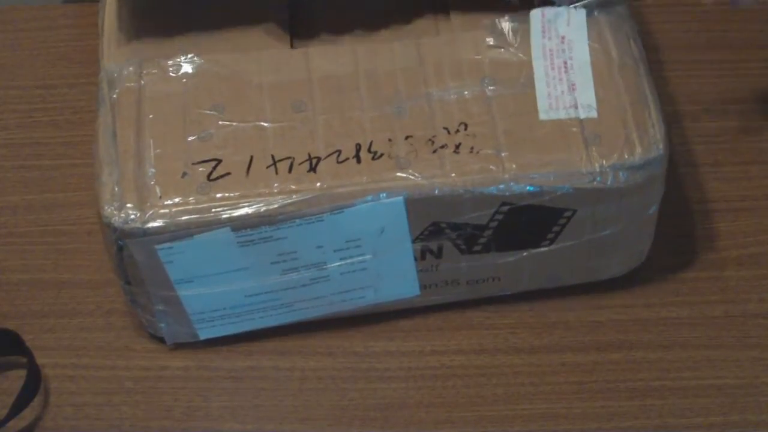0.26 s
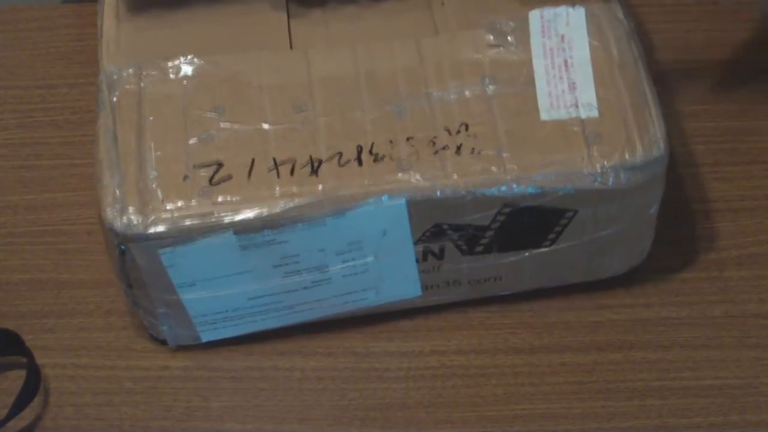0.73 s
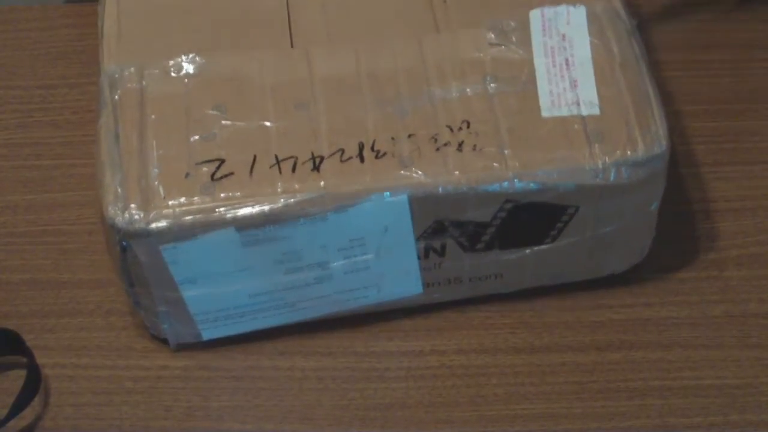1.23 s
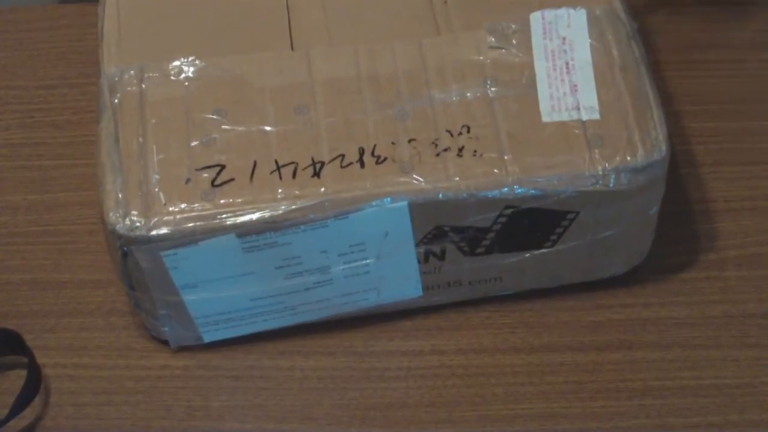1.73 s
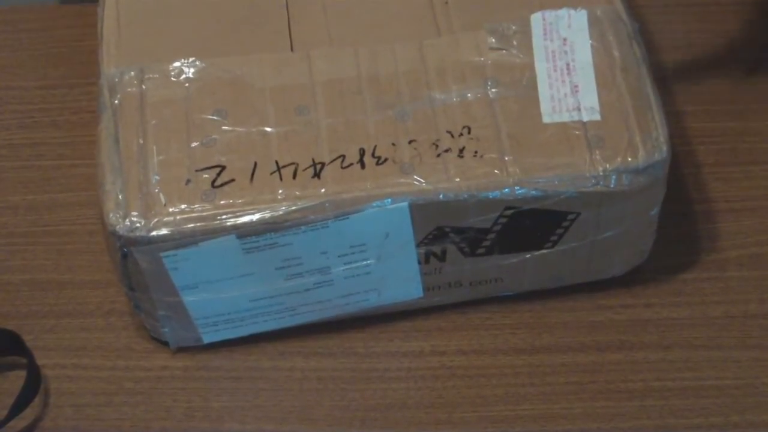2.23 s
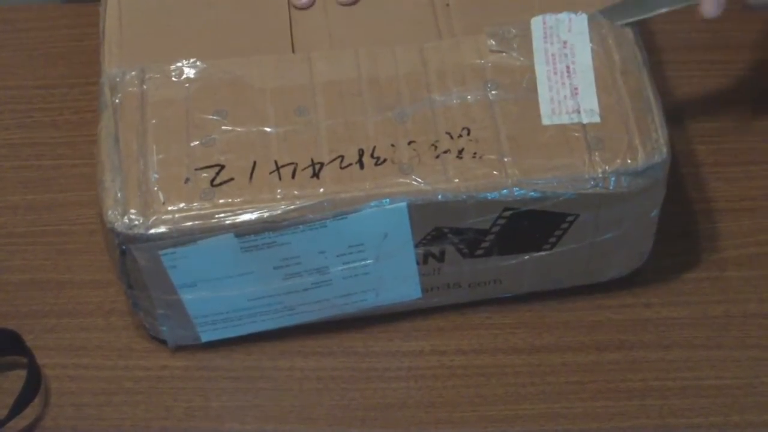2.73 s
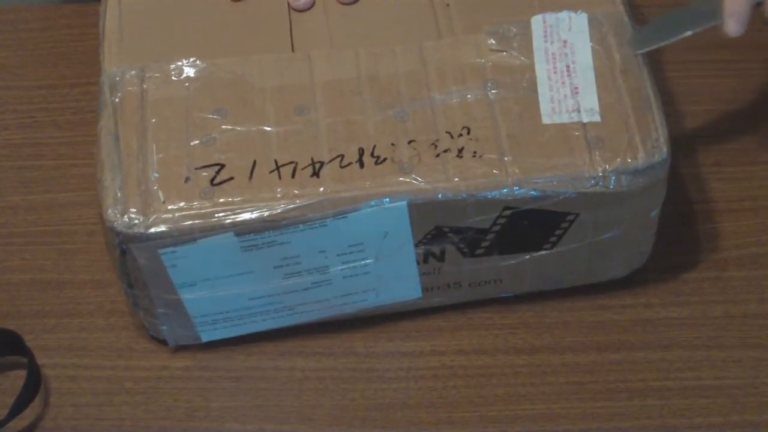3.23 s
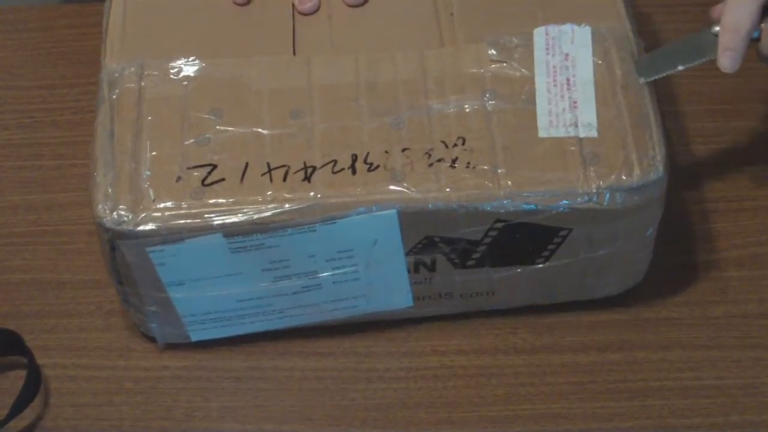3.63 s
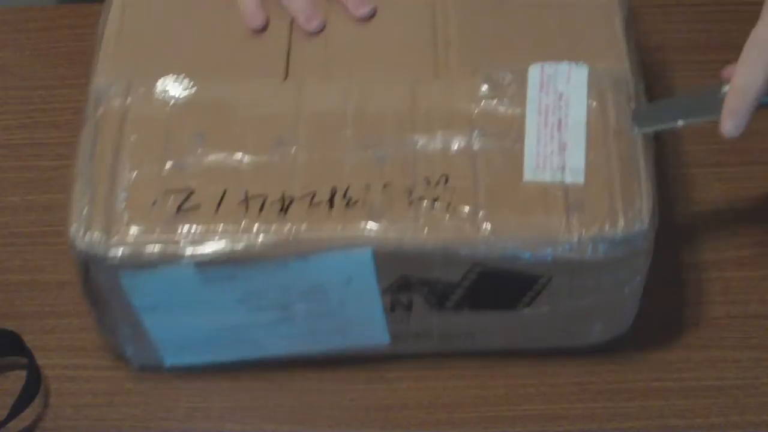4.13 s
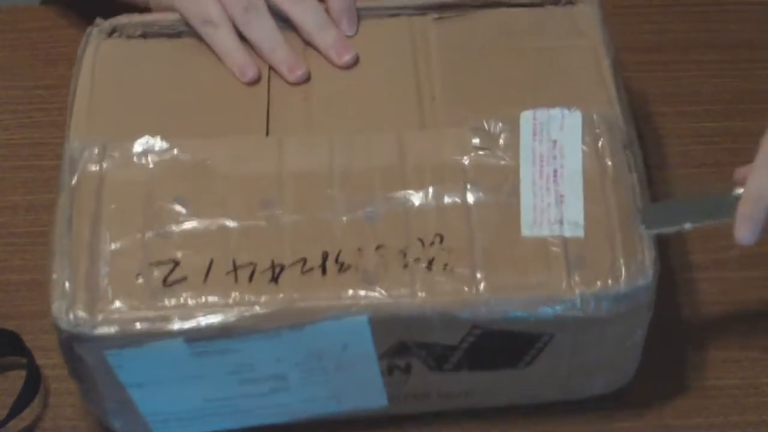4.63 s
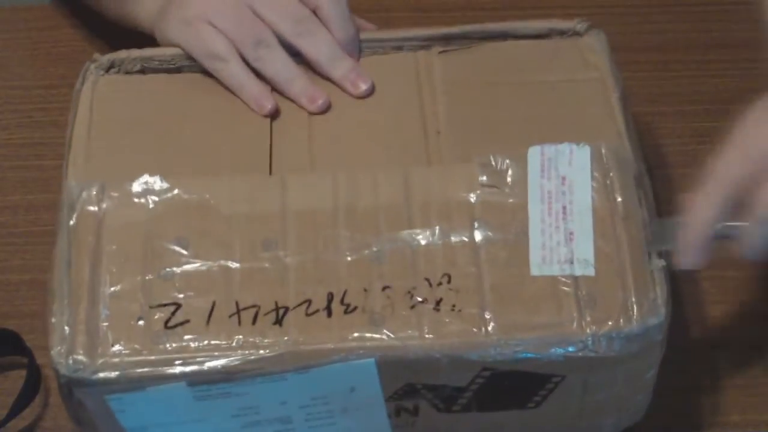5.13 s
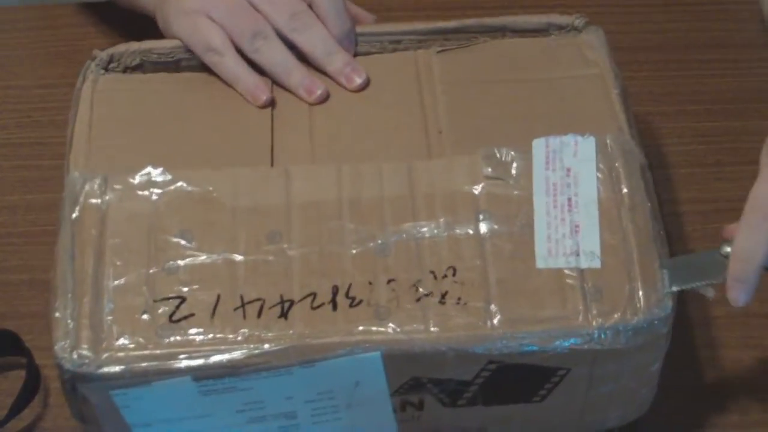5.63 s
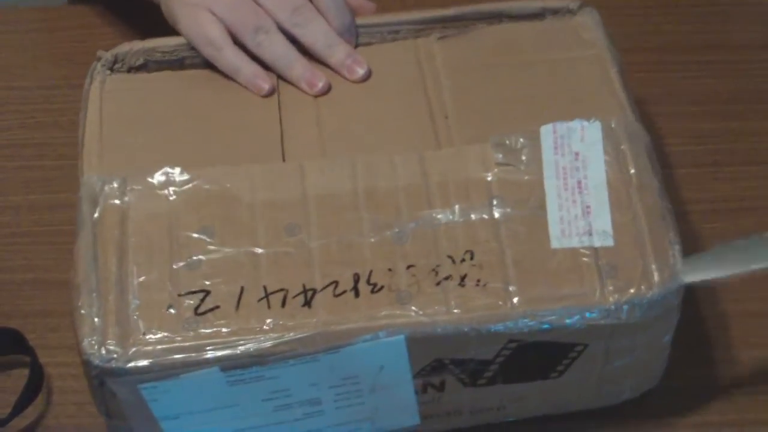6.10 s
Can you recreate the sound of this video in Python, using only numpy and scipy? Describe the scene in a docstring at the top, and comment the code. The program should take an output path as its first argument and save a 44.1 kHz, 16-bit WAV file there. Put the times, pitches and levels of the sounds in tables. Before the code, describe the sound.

In a small room, close to the microphone, tape on a cardboard box rips in a quick burst of sharp snaps, crackle and hollow knocks with low puffs. A quieter gap has soft hand rubs and a short fingertip squeak. More snapping follows, then scattered ticks and bumps, and finally a knife judders through the side wall. Faint hum and dull hiss stay beneath.

```python
"""Sharp snaps and crackle, hollow knocks and soft puffs: a knife slits the tape of a cardboard box in a small room.
Snaps are short pulse and noise bursts; they knock the modes of the flap, and jerks of the flap puff air out.
Random grains make the tearing tape, the hand sliding over the board and the palm brushing the lid.
Late on, the blade judders along the side wall by stick and slip; mains hum and hiss lie below throughout."""
import sys
import numpy as np
from scipy import signal
from scipy.fft import rfft, irfft
from scipy.io import wavfile

SR = 44100
rng = np.random.default_rng(int(sys.argv[2]) if len(sys.argv) > 2 else 0)


def int16_out(signal):
    """Quantize to a 16-bit WAV file."""
    q = np.round(np.clip(np.atleast_2d(signal).T, -1, 1) * 32767)
    wavfile.write(sys.argv[1], SR, q.astype(np.int16))


N = 280514  # samples


def from_db(db):
    """Decibel law: 20 dB is a factor of ten in amplitude."""
    return 10 ** (np.asarray(db) / 20)


def rms_one(x):
    """Normalisation to unit root mean square."""
    return x / np.sqrt(np.mean(x ** 2) + 1e-20)


def at_hz(points, hz):
    """Interpolation of a spectrum along a logarithmic frequency axis."""
    point_hz, values = np.array(points).T[:2]
    return np.interp(np.log(np.maximum(hz, 1)), np.log(point_hz), values)


def butter(x, hz, kind):
    """Second-order Butterworth filter, flat in its passband."""
    return signal.sosfilt(signal.butter(2, hz, kind, fs=SR, output="sos"), x)


def colour(x, spectrum):
    """Minimum-phase filter: folding the cepstrum makes the given spectrum causal."""
    size = 8192
    log_gain = np.log(from_db(at_hz(spectrum, np.fft.rfftfreq(size, 1 / SR))))
    cepstrum = irfft(log_gain)
    cepstrum[1:size // 2] *= 2
    cepstrum[size // 2 + 1:] = 0
    impulse_response = irfft(np.exp(rfft(cepstrum)))
    return signal.fftconvolve(x, impulse_response)[:len(x)]


def drift(rate):
    """Slow random fluctuation of unit rms: lines between chance values, rate of them a second."""
    knots = np.arange(N) / SR * rate
    return rms_one(np.interp(knots, np.arange(4096), rng.standard_normal(4096)))


def clicks(times, sizes):
    """Impulsive forcing: one sample of the given size at each time."""
    out = np.zeros(N)
    at = np.round(np.asarray(times) * SR).astype(int)
    out[np.clip(at, 0, N - 1)] = sizes
    return out


def ring(force, hz, t60):
    """Damped resonator: a unit click starts an oscillation of height 1 that falls 60 dB in t60 seconds."""
    r = from_db(-60 / (t60 * SR))
    w = 2 * np.pi * hz / SR
    return signal.lfilter([1, -r * np.cos(w)], [1, -2 * r * np.cos(w), r * r], force + 1e-18)


def body(force, modes):
    """Modal superposition: one force drives all modes in parallel, with alternating signs."""
    return sum((-1) ** k * from_db(db) * ring(force, hz, t60) for k, (hz, db, t60) in enumerate(modes))


def grains(per_s, spread_db):
    """Poisson process of tiny breaks: random moments and signs, most of them faint."""
    sizes = from_db(spread_db * np.minimum(rng.exponential(1, N), 3.5))
    signs = rng.choice([-1, 1], N)
    return sizes * signs * (rng.random(N) < per_s / SR)


def envelopes(rows, attack_s, release_s):
    """Exponential growth and decay around each gesture, added in power; one gain for each level column."""
    t, power = np.arange(N) / SR, 0
    for s, length_s, *levels_db in rows:
        before = np.maximum(s - t, 0)
        after = np.maximum(t - s - length_s, 0)
        shape = np.exp(-before / attack_s - after / release_s)
        power = power + (from_db(levels_db)[:, None] * (shape + 1e-9)) ** 2
    return np.sqrt(power)


# Spectrum of the hiss and rumble. Each row: frequency in Hz, density in relative dB per Hz.
HISS_SPECTRUM = [(10, -11), (28, -1.5), (45, -11), (90, -13), (140, -14), (200, -17), (300, -16),
                 (450, -21), (800, -23.5), (1500, -26.5), (3000, -28), (6800, -28.5), (9000, -84)]
# Course of the background hiss. Each row: time in seconds, level in dB rms.
HISS_LEVEL = [(0, -51), (1.3, -47.5), (2.4, -49), (3.7, -50.5), (4.2, -47), (4.9, -46.5), (5.7, -49),
              (6.36, -44.5)]
# Components of the mains hum. Each row: frequency in Hz, mean level in dB rms.
HUM = [(59.5, -58), (119.5, -57), (242, -60)]


def background(waver_db=0.2):
    """Stationary noise and tones: filtered hiss at a slowly moving level, hum wavering in level and phase."""
    t = np.arange(N) / SR
    hiss_gain = from_db(np.interp(t, *np.transpose(HISS_LEVEL)))
    hiss = hiss_gain * rms_one(colour(rng.standard_normal(N), HISS_SPECTRUM))
    hum = 0
    for hz, db in HUM:
        height = np.sqrt(2) * from_db(db + waver_db * drift(5.8))
        hum = hum + height * np.sin(2 * np.pi * hz * t + 0.13 * drift(2.3))  # phase wander in radians
    return hiss + hum


# Rips of the tape. Each row: start in seconds, length in seconds, crackle level in dB,
# box rustle level in relative dB.
RIPS = [(0.008, 0.018, -31, -32), (0.04, 0.052, -37, -32), (0.11, .025, -40, -34),
        (0.168, .035, -48.5, -34.5), (0.462, .008, -51, -55), (0.478, .004, -29.5, -38),
        (0.503, 0.019, -45.5, -36), (0.56, 0.078, -47, -50.5), (0.765, 0.015, -34, -31),
        (0.815, 0.028, -34.5, -42), (0.868, 0.01, -33, -36), (0.912, 0.041, -35, -34),
        (2.515, 0.03, -52, -36.5), (2.56, 0.13, -49, -53), (2.82, 0.074, -42, -38),
        (3.01, 0.037, -42.5, -51), (3.072, 0.018, -37, -29), (3.118, 0.045, -37.5, -34),
        (3.19, 0.079, -48, -58), (3.345, 0.046, -46, -49.5), (4.555, 0.016, -41.5, -39.5),
        (4.6, 0.024, -39.5, -33), (5.12, 0.037, -40, -37), (5.195, 0.023, -44, -40),
        (5.32, 0.021, -42, -34), (5.465, 0.029, -44, -52)]
RIP_ATTACK_S, RIP_RELEASE_S = 0.0074, 0.016
# Colour of the crackle. Each row: frequency in Hz, gain in relative dB.
CRACKLE_SPECTRUM = [(300, -10), (900, -5.5), (1600, -7), (2600, -8.5), (4000, -10.5), (5500, -5.5),
                    (7000, -11), (9000, -14.5)]
# Modes of the top flap. Each row: frequency in Hz, strength in relative dB, 60 dB decay time in seconds.
FLAP_MODES = [(112, -15, 0.078), (143.2, -9.5, 0.12), (212.2, -5, 0.11), (253.5, -2.5, 0.073),
              (302.3, -2, 0.063), (349, -3.5, 0.064), (408, -4.5, 0.055), (510, -1.5, 0.049),
              (616, -8, 0.045), (703, -5, 0.037), (980, 2.5, 0.012), (1016, 2.5, 0.015), (1193, -7, 0.029),
              (1368, -7.5, 0.033), (1456, -12.5, 0.022)]


def tearing(crackle_db=0, rustle_db=-1, sway_db=-10, clump_db=2.5):
    """Random fracture: clumps of tiny breaks crackle and shake the flap's modes; its sway fans the air."""
    crackle, rustle = envelopes(RIPS, RIP_ATTACK_S, RIP_RELEASE_S)
    fibres = grains(per_s=1300, spread_db=6.0) * from_db(clump_db * drift(200))
    top = from_db(crackle_db) * crackle * rms_one(colour(fibres, CRACKLE_SPECTRUM))
    shaking = fibres + grains(per_s=6000, spread_db=3.5)
    box = from_db(rustle_db) * rms_one(body(shaking, FLAP_MODES))
    air = from_db(sway_db) * rms_one(butter(rng.standard_normal(N), [12, 60], "band"))
    return top + rustle * (box + air)


# Jerks with which the flap gives way. Each row: time in seconds, level in relative dB.
JERKS = [(0.037, -49.5), (0.368, -31), (0.473, -30), (0.638, -32), (0.762, -27), (0.813, -29), (0.911, -28),
         (2.509, -41.5), (2.862, -28.5), (3.06, -25.5), (3.125, -22), (4.599, -35.5), (5.322, -29),
         (6.209, -32)]
# Bumps of the box on the table. Each row: time in seconds, level in relative dB.
BUMPS = [(0.04, -29), (0.161, -24.5), (0.48, -16), (0.766, -21.5), (2.51, -34), (5.3929, -23),
         (6.203, -31.5)]


def puffs(puff_db=1, bump_db=0):
    """Damped resonance: jerks push air out in a very low swing, and bumps on the table thud."""
    s, level_db = np.transpose(JERKS)
    air = ring(clicks(s, from_db(level_db + puff_db)), hz=9, t60=0.12)
    s, level_db = np.transpose(BUMPS)
    thuds = ring(clicks(s, from_db(level_db + bump_db)), hz=131.7, t60=0.082)
    return butter(air, 160, "low") + butter(thuds, 500, "low")


# Snaps of tape and board. Each row: time in seconds, crack level in relative dB, crack pitch in Hz,
# box knock level in relative dB.
SNAPS = [(0.0391, -10.5, 2020, -15.5), (0.0614, -17, 4400, -52), (0.0718, -8, 3050, -37),
         (0.1597, -16, 1580, -17.5), (0.164, -17, 1000, -34), (0.191, -20, 1500, -31),
         (0.2962, -26.5, 3800, -51), (0.3442, -26, 4970, -38.5), (0.3686, -16, 4200, -46),
         (0.3748, -10, 4160, -27.5), (0.4748, -4, 2600, -28.5), (0.4772, -4.5, 1090, -35),
         (0.497, -3.5, 2640, -17.5), (0.6392, -24, 2540, -39.5), (0.7599, -7.5, 3100, -43),
         (0.765, -5, 1280, -10), (0.7712, -16, 1090, -29), (0.8133, -8.5, 2640, -41),
         (0.867, -12, 1900, -33), (0.9085, -13.5, 1470, -27), (0.9204, -17, 4360, -31.5),
         (1.1488, -13, 3020, -22), (1.649, -28.5, 4600, -48), (2.5095, -14.5, 3700, -24),
         (2.6979, -23, 4300, -42), (2.7923, -22.5, 5630, -52), (2.8184, -18, 3400, -25.5),
         (2.8481, -14, 3600, -53), (2.869, -15.5, 4200, -29), (2.914, -20.5, 3700, -40),
         (3.038, -23, 2980, -37), (3.0574, -16.5, 3500, -28), (3.0689, -9, 2120, -29),
         (3.139, -16, 2600, -21), (3.1527, -12.5, 2720, -39), (3.3145, -26, 5500, -59),
         (3.3283, -22, 4500, -55), (3.349, -23.5, 1100, -22.5), (3.431, -28.5, 2020, -36.5),
         (3.886, -22.5, 3160, -26), (3.9198, -20, 3360, -26.5), (4.3284, -23, 1720, -28),
         (4.3893, -18, 1640, -20.5), (4.4523, -17, 3340, -20), (4.5501, -23.5, 1200, -23.5),
         (4.6027, -17.5, 3200, -25.5), (5.1172, -25.5, 2300, -18.5), (5.3218, -24, 2800, -46),
         (5.349, -22, 4030, -49), (5.493, -15.5, 3740, -25.5), (5.979, -28, 5500, -46),
         (6.036, -22.5, 3500, -37), (6.2031, -18.5, 3000, -41.5), (6.215, -15.5, 3770, -53)]
# Colour shared by all cracks. Each row: frequency in Hz, gain in relative dB.
CRACK_SPECTRUM = [(300, -12.5), (800, 11.5), (1500, 3), (2600, 3), (4000, 2), (5500, 3.5), (7000, -1),
                  (12000, 3.5)]
CUTOFF_HZ = 7150  # upper limit of the microphone


def cracks(bursts, level_db, width=2.22):
    """Band-limited impulse radiation: each snap's burst is filtered around its pitch and set by its energy."""
    out = np.zeros(N + SR)
    for (s, crack_db, hz, _), burst in zip(SNAPS, bursts):
        band = [hz / width, min(hz * width, .4 * SR)]
        burst = signal.lfilter(*signal.butter(1, band, "band", fs=SR), burst)
        burst = butter(burst, hz / 5, "high")
        passed = np.linalg.norm(butter(burst, CUTOFF_HZ, "low"))  # root energy below the cutoff
        at = int(s * SR)
        out[at:at + len(burst)] += from_db(crack_db + level_db) * burst / passed
    return colour(out[:N], CRACK_SPECTRUM)


def pulse_clusters(gap_s=.0007, loss_db=5.5, count=3):
    """Pulse cluster: each snap is a few sharp clicks about a millisecond apart, each weaker than the last."""
    gaps = gap_s * rng.uniform(.5, 1.5, (len(SNAPS), count))
    pulses = np.zeros((len(SNAPS), SR // 40))
    for pulse, gap in zip(pulses, gaps):
        at = ((np.cumsum(gap) - gap[0]) * SR).astype(int) % len(pulse)
        pulse[at] = rng.choice([-1, 1], count) * from_db(-loss_db * np.arange(count))
    return cracks(pulses, level_db=5.5)


def splinters(splinter_s=.0016):
    """Decaying noise burst: the broken edge splinters for a few milliseconds."""
    t = np.arange(SR // 40) / SR
    noise = rng.standard_normal((len(SNAPS), len(t)))
    return cracks(noise * np.exp(-t / splinter_s) * (t > .0003), level_db=-2.0)


def knocks(knock_db=-9, scatter_db=2.0):
    """Modal excitation by impact: each snap strikes every flap mode with a strength of its own."""
    s, _, _, level_db = np.transpose(SNAPS)
    scatter = scatter_db * rng.standard_normal((len(s), len(FLAP_MODES)))
    sizes = from_db(level_db[:, None] + knock_db + scatter)
    rings = 0
    for k, (hz, db, t60) in enumerate(FLAP_MODES):
        rings = rings + (-1) ** k * from_db(db) * ring(clicks(s, sizes[:, k]), hz, t60)
    return butter(rings, 2500, "low")


# Strokes of hand and blade on the board. Each row: start in seconds, length in seconds,
# friction hiss level in dB, wall drone level in relative dB.
STROKES = [(1.44, 0.057, -57, -54), (1.555, 0.045, -43.5, -46.5), (1.925, 0.024, -52, -49),
           (2.462, 0.015, -41, -46), (5.28, 0.038, -42, -40), (5.352, 0.0057, -36.5, -51),
           (5.395, .008, -42, -42.5), (5.435, .006, -41.5, -58), (5.978, .035, -37, -34.5),
           (6.048, 0.019, -44.5, -32), (6.09, 0.014, -53, -33), (6.145, 0.077, -43.5, -37),
           (6.216, 0.013, -40, -27), (6.25, 0.018, -66, -48)]
STROKE_ATTACK_S, STROKE_RELEASE_S = 0.017, 0.0064
# Colour of the friction. Each row: frequency in Hz, gain in relative dB.
FRICTION_SPECTRUM = [(300, -5.5), (800, -15), (1400, -4.5), (2300, -9.5), (3500, -6), (5500, -2),
                     (7000, -5.5), (9000, -20.5)]
# Sticking and slipping of the blade in the side wall. Each row: time in seconds, level in relative dB.
SLIPS = [(5.980, -24.5), (6.036, -14.5), (6.062, -28), (6.092, -25), (6.19, -22), (6.2032, -13.5),
         (6.215, -24)]
# Modes of the side wall. Each row: frequency in Hz, strength in relative dB, 60 dB decay time in seconds.
WALL_MODES = [(146, -13, 0.098), (236, -6.5, 0.036), (274, -10.5, 0.08), (320, -14, 0.094),
              (394, -3, 0.033), (506.5, -3.5, 0.076), (570, -10.5, 0.037), (613, -13, 0.1),
              (795, -10, 0.022), (980, -9, 0.02), (1480, -14, 0.011)]


def sliding(hiss_db=0, drone_db=-1, slip_db=-2, contact_hz=2500, catch_db=4.5):
    """Stick-slip friction: fine contacts hiss on the board, and slips set the side wall's modes droning."""
    hiss, drone = envelopes(STROKES, STROKE_ATTACK_S, STROKE_RELEASE_S)
    contacts = colour(grains(per_s=7600, spread_db=2.5), FRICTION_SPECTRUM)
    rub = rms_one(contacts * from_db(catch_db * drift(220)))
    judder = rms_one(body(grains(per_s=900, spread_db=3.0), WALL_MODES))
    s, level_db = np.transpose(SLIPS)
    slips = body(clicks(s, from_db(level_db + slip_db)), WALL_MODES)
    slips = butter(slips, contact_hz, "low")
    return from_db(hiss_db) * hiss * rub + from_db(drone_db) * drone * judder + slips


# Brushes of a palm over the lid. Each row: start in seconds, length in seconds, level in dB.
BRUSHES = [(1.56, 0.038, -54.5), (1.76, .06, -56), (1.935, 0.022, -48), (2.125, 0.021, -46),
           (2.18, 0.076, -49)]
BRUSH_ATTACK_S, BRUSH_RELEASE_S = 0.027, 0.028
# Colour of skin on cardboard. Each row: frequency in Hz, gain in relative dB.
PALM_SPECTRUM = [(200, -23.5), (500, 5.5), (800, 0.5), (1450, 0.5), (1900, -9.5), (3000, -12.5),
                 (7000, -13), (9000, -44)]


def brushing():
    """Soft-contact friction: skin on cardboard gives a dull, finely grained rub."""
    pressure, = envelopes(BRUSHES, BRUSH_ATTACK_S, BRUSH_RELEASE_S)
    return pressure * rms_one(colour(grains(per_s=2900, spread_db=5.0), PALM_SPECTRUM))


# Squeaks of fingertips on the side wall. Each row: centre in seconds, Gaussian width in seconds,
# mean slip rate per second, level in dB.
SQUEAKS = [(1.574, .022, 485, -37), (1.948, .02, 500, -50), (2.472, .012, 490, -47)]


def squeaking(jitter=0.0391):
    """Near-periodic stick-slip: a dragged fingertip slips almost evenly, near a resonance of the wall."""
    t, out = np.arange(N) / SR, 0
    for s, width_s, hz, db in SQUEAKS:
        cycles = np.cumsum(hz * (1 + jitter * drift(150))) / SR
        pulses = np.diff(np.floor(cycles), prepend=0)  # one slip per completed cycle
        squeak = rms_one(butter(body(pulses, WALL_MODES), [250, 1600], "band"))
        out = out + from_db(db) * np.exp(-((t - s) / width_s) ** 2) * squeak
    return out


# Decay of the room. Each row: frequency in Hz, 60 dB decay time in seconds.
ROOM_T60 = [(100, 0.43), (260, 0.24), (700, 0.28), (1840, 0.3), (4850, 0.27), (7500, 0.16)]


def echo(early_db=-5, early_s=0.0075, tail_db=-3):
    """Reverberation: table and box scatter sound at once; the walls' tail dies band by band."""
    t = np.arange(SR // 2) / SR
    edges = np.geomspace(90, 11520, 8)  # band edges in Hz
    tail = 0
    for lo, hi in zip(edges, edges[1:]):
        decay = from_db(-60 * t / at_hz(ROOM_T60, np.sqrt(lo * hi)))
        tail = tail + butter(rng.standard_normal(len(t)), [lo, hi], "band") * decay
    tail = tail * np.clip((t - .003) / 0.0038, 0, 1)  # fades in after the early scatter has begun
    early = butter(rng.standard_normal(len(t)), [150, 11000], "band")
    early = early * np.exp(-t / early_s) * (t > .001)
    mix = from_db(tail_db) * rms_one(tail) + from_db(early_db) * rms_one(early)
    return mix / np.sqrt(2 * len(t))


def room(x, count=5):
    """Blended reverberation: several random echoes of one small room, in drifting shares, give an even tail."""
    shares = np.array([drift(25) for _ in range(count)]) ** 2
    shares = shares / np.linalg.norm(shares, axis=0)
    return sum(signal.fftconvolve(x * share, echo())[:N] for share in shares)


def scene():
    """Linear superposition: the box and its echo in the room, the dry splintering and the background."""
    box = tearing() + puffs() + pulse_clusters() + knocks() + sliding() + brushing() + squeaking()
    return (box + room(box) + splinters() + background())[None]


def record(dry):
    """Saturation and band-limiting: a narrow-band microphone rounds high peaks and cuts the top steeply."""
    rounded = .9 * np.tanh(dry / .9)
    low_pass = signal.ellip(8, .4, 56, CUTOFF_HZ, fs=SR, output="sos")  # ripple, stopband in dB
    return signal.sosfilt(low_pass, rounded)


dry = scene()
out = record(dry)
int16_out(out)
```